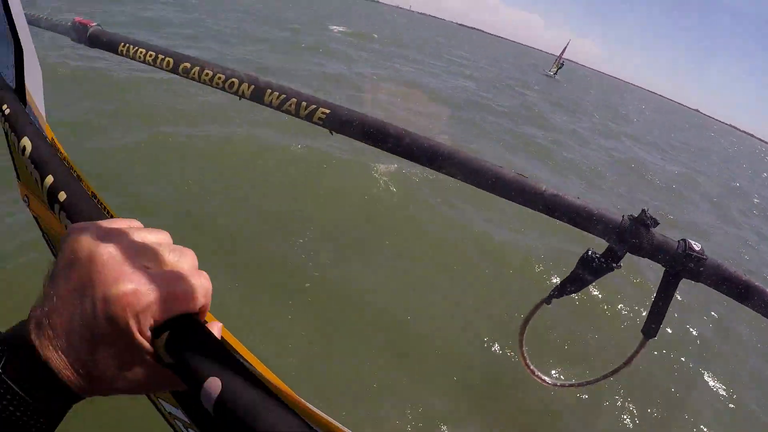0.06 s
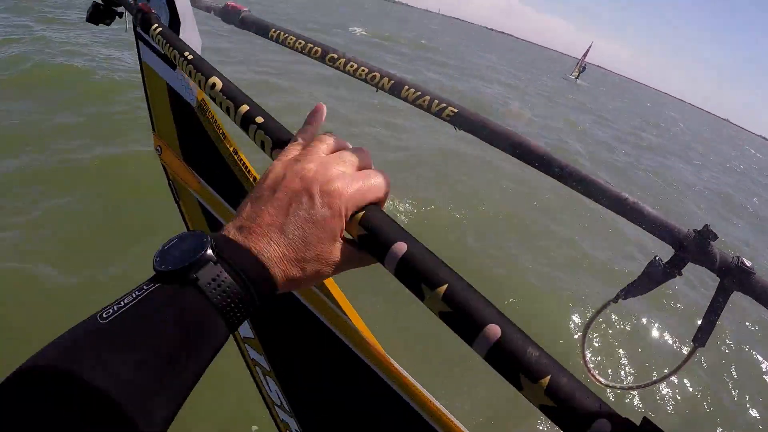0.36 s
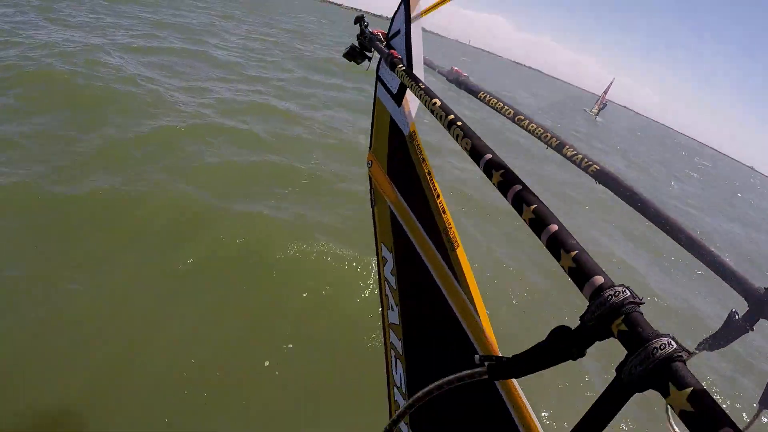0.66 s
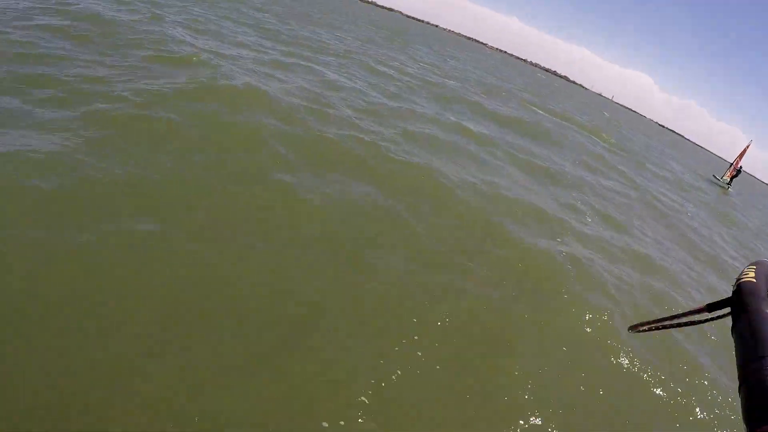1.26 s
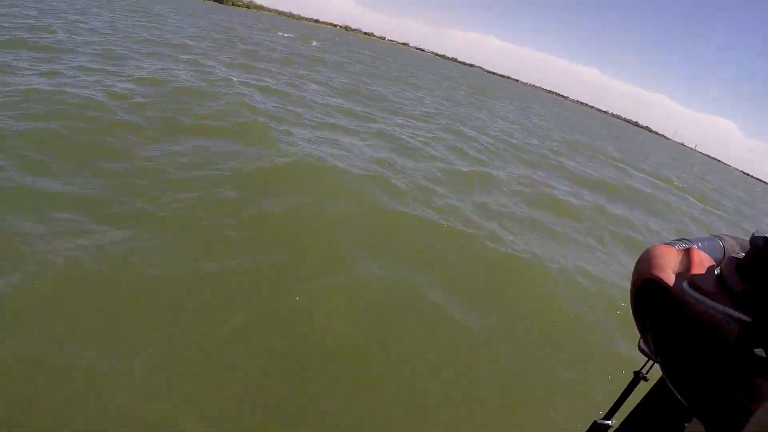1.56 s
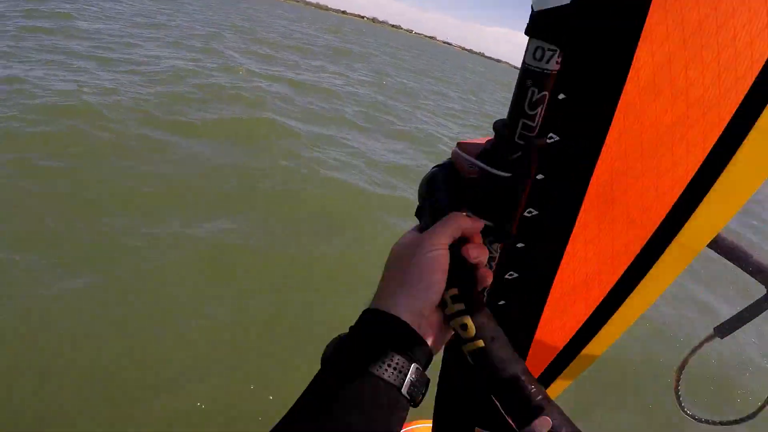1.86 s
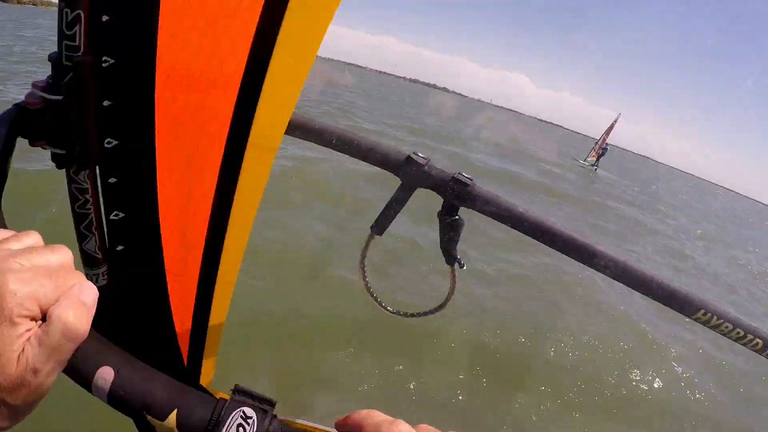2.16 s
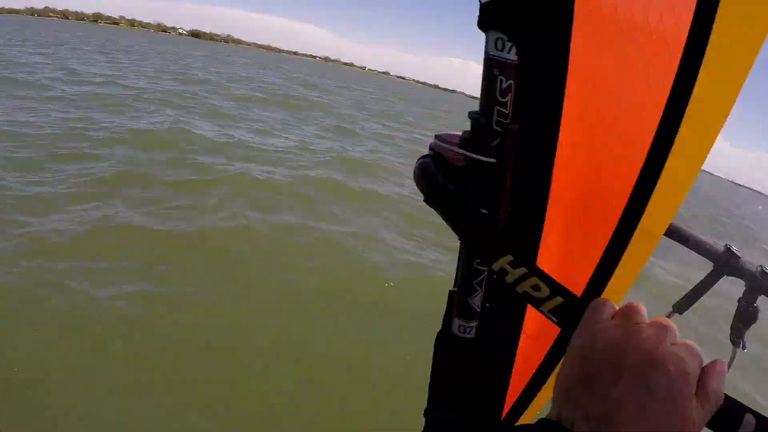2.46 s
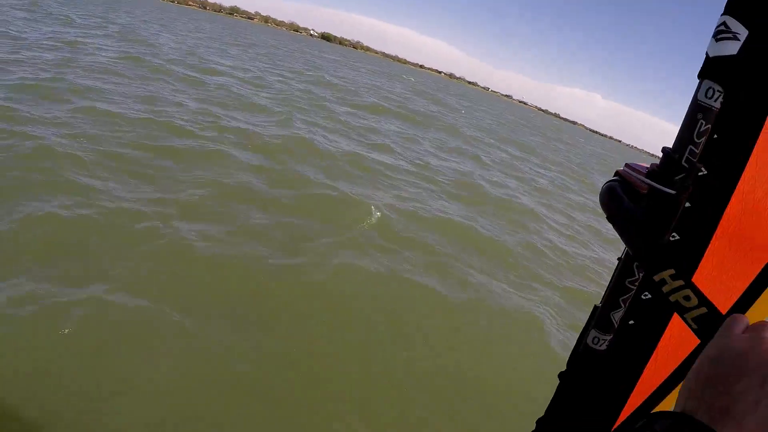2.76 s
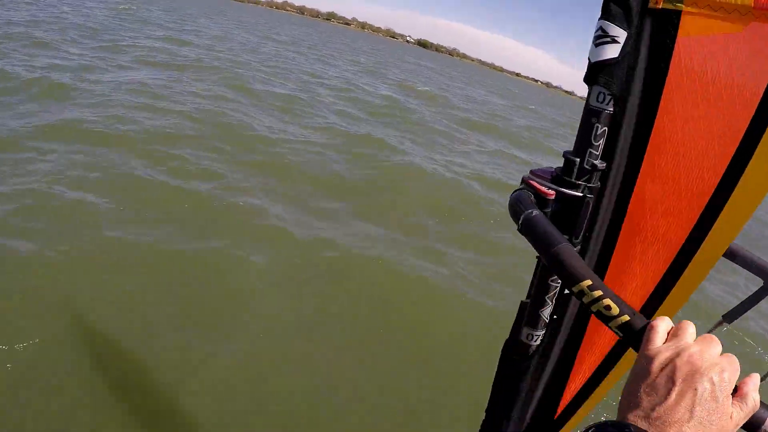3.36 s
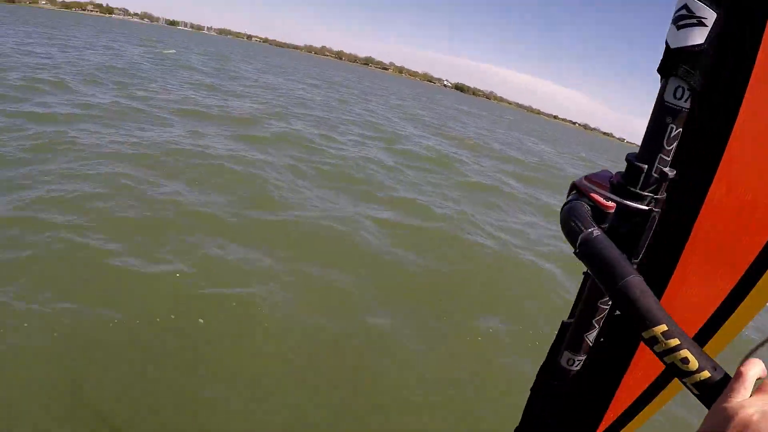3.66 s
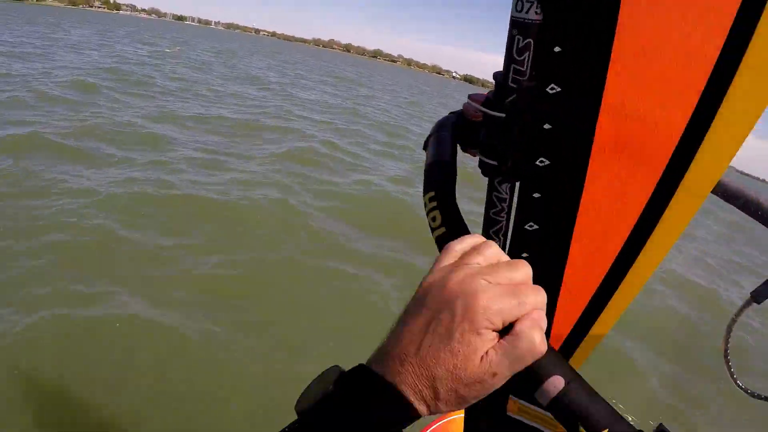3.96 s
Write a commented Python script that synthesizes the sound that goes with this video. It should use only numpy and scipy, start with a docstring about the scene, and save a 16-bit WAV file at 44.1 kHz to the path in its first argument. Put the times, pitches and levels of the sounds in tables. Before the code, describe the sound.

A windsurfing sail swings round with a faint swish, then snaps through with one loud thump. Sparse clacks and dull taps come before and after, over low wind rumble and soft water wash, close to a body-worn microphone.

```python
"""A windsurfing sail flips in a turn: it swishes round, its film shudders and its battens snap through.
The blows excite the damped modes of mast and boom; fittings clack, a hand scrapes and wet gear squeaks.
Dull taps ring the case of the body-worn waterproof camera that hears it all. Beneath lie the rumble
of turbulent wind and the wash of the board, with spitting spray, resonating bubbles and fizzing foam."""
import sys
import numpy as np
from scipy import signal
from scipy.fft import rfft, irfft, next_fast_len
from scipy.io import wavfile
from scipy.ndimage import uniform_filter1d

SR = 44100
rng = np.random.default_rng(int(sys.argv[2]) if len(sys.argv) > 2 else 0)


def generate_wav(signal):
    """Clip the signal to [-1, 1] and save it as 16-bit WAV at the path in sys.argv[1]."""
    frames = np.transpose(np.atleast_2d(signal))
    scaled = np.clip(frames, -1, 1) * 32767
    pcm = np.round(scaled).astype(np.int16)
    wavfile.write(sys.argv[1], SR, pcm)


N = 176400
T = np.arange(N) / SR


def undb(db):
    """Decibels to amplitude ratio."""
    return 10 ** (np.asarray(db) / 20)


def unit(x):
    """Normalisation to rms 1."""
    return x / np.sqrt(np.mean(x ** 2))


def curve(rows):
    """Gain envelope, linear in decibels between (time, level) points."""
    return undb(np.interp(T, *np.array(rows).T))


def colour(x, points):
    """Minimum-phase filter through (frequency, gain) points; it keeps the power of white noise."""
    size = next_fast_len(N + SR // 4, real=True) // 2 * 2
    hz, db = np.array(points, float).T
    log_hz = np.log(np.maximum(np.fft.rfftfreq(size, 1 / SR), 1))
    bass_cut_db = 20 * np.maximum(np.log(hz[0]) - log_hz, 0)
    gain = undb(np.interp(log_hz, np.log(hz), db) - bass_cut_db)
    cepstrum = irfft(np.log(unit(gain)))
    cepstrum[1:size // 2] *= 2  # folding makes the filter causal
    cepstrum[size // 2 + 1:] = 0
    return irfft(rfft(x, size) * np.exp(rfft(cepstrum)))[:N]


def band(x, hz, width):
    """Two equal resonators in cascade, output rms 1."""
    b, a = signal.iirpeak(min(hz, SR * .45), hz / width, fs=SR)
    return unit(signal.lfilter(b, a, signal.lfilter(b, a, x)))


def ring(start, hz, t60):
    """Free vibration of one mode: a damped sine."""
    out, live = np.zeros(N), slice(int(start * SR) + 1, int((start + 2 * t60) * SR))
    age = T[live] - start
    out[live] = np.sin(2 * np.pi * hz * age) * np.exp(-np.log(1000) * age / t60)
    return out


def fade(start, tau):
    """Sudden onset, then exponential decay with time constant tau."""
    return (T >= start) * np.exp(-np.minimum(abs(T - start) / tau, 50))


def bell(centre, sigma):
    """Gaussian envelope of standard deviation sigma."""
    out = np.zeros(N)
    live = slice(max(int((centre - 6 * sigma) * SR), 0), int((centre + 6 * sigma) * SR))
    out[live] = np.exp(-((T[live] - centre) / sigma) ** 2 / 2)
    return out


def wander(per_s):
    """Slow fluctuation: smoothed random steps, rms 1."""
    hold = max(int(SR / per_s), 2)
    steps = np.repeat(rng.standard_normal(N // hold + 1), hold)
    return unit(uniform_filter1d(uniform_filter1d(steps, hold), hold)[:N])


def grains(per_s, spread_db):
    """Shot noise: random impulses of uneven size, rms 1."""
    hits = (rng.random(N) < per_s / SR) * rng.choice([-1, 1], N)
    return unit(hits * undb(spread_db * np.minimum(rng.exponential(size=N), 5)))


def flicker(x, depth_db):
    """Independent amplitude modulation of seven octave bands."""
    octave = np.log2(np.maximum(np.fft.rfftfreq(N, 1 / SR), 1) / 250).clip(0, 6)
    spectrum = rfft(x)
    bands = (irfft(spectrum * np.maximum(1 - abs(octave - k), 0), N) for k in range(7))
    return sum(part * undb(depth_db * wander(29.96)) for part in bands)


# Gust envelope (time [s], relative level [dB])
GUSTS = [(0.0, -50), (0.15, -37), (0.19, -44.5), (0.31, -46.5), (0.52, -56), (0.63, -46), (0.76, -53),
         (0.78, -43), (0.93, -55), (1.43, -41), (1.54, -31.5), (1.66, -37), (1.8, -34), (1.86, -46),
         (2.35, -52), (2.38, -36.5), (2.47, -51.5), (2.6, -42), (2.7, -60.5), (2.81, -48), (2.87, -68),
         (2.97, -41), (3.0, -49), (3.2, -40.5), (3.24, -30.5), (3.45, -55.5), (3.51, -43.5), (4.0, -45.5)]
# Buffeting spectrum (frequency [Hz], gain [dB])
WIND_SPECTRUM = [(12, -15), (22, 0), (30, 4.5), (42, -2), (54, 0), (66, -15), (80, -24.5), (120, -32.5),
                 (200, -39), (500, -57.5), (3000, -100)]
def wind():
    """Turbulent pressure fluctuations buffet the case with a low rumble."""
    rumble = unit(colour(rng.standard_normal(N), WIND_SPECTRUM))
    running_rms = np.sqrt(uniform_filter1d(rumble ** 2, size=4000))
    return rumble / running_rms * curve(GUSTS) * undb(1)


# Slosh and wash envelopes (time [s], relative level [dB])
SLOSH_LEVEL = [(0, -62.5), (.14, -73.5), (.3, -72), (.52, -63), (.85, -75.5), (1.1, -85), (1.35, -81.5),
               (1.6, -63.5), (1.92, -57.5), (2.15, -63), (2.55, -66.5), (2.85, -73.5), (3.1, -72),
               (3.25, -65), (3.45, -67), (3.8, -70), (4, -70)]
WASH_LEVEL = [(0, -64.5), (.1, -73), (.6, -71), (.85, -73.5), (1.0, -75), (1.2, -75.5), (1.35, -72.5),
              (1.6, -69.5), (2.05, -74), (2.35, -66.5), (2.55, -68), (2.85, -73), (3.05, -70.5),
              (3.25, -67.5), (3.4, -69), (3.6, -70.5), (3.8, -66), (4, -72.5)]
# Their spectra (frequency [Hz], gain [dB])
SLOSH_SPECTRUM = [(60, -13), (110, 4.5), (180, -0.5), (300, -9), (600, -17.5), (1200, -34), (6000, -71)]
WASH_SPECTRUM = [(150, -19.5), (250, -3), (465, -3), (600, -5.5), (900, -5.5), (1650, -6), (1950, -3.5),
                 (2250, -7), (2800, -12.5), (3500, -11), (5100, -24), (5800, -18.5), (6300, -26.5),
                 (7000, -22.5), (8200, -32), (9700, -28), (11500, -31), (13200, -35.5), (15500, -48.5)]
def water():
    """Flow noise along the board: a low slosh and a grainy wash, each swelling at random."""
    slosh = colour(rng.standard_normal(N), SLOSH_SPECTRUM) * curve(SLOSH_LEVEL) * undb(wander(20) - 1)
    wash = colour(grains(per_s=6000, spread_db=2.5), WASH_SPECTRUM) * curve(WASH_LEVEL)
    wash *= undb(wander(25.12))
    return slosh + flicker(wash, depth_db=1.5)


def hiss():
    """Stationary broadband noise forms a faint floor."""
    spectrum = [(500, -16.5), (3000, 4), (9000, -4), (15000, -23)]  # (frequency [Hz], gain [dB])
    return undb(-84.5) * colour(rng.standard_normal(N), spectrum)


# Contacts on the boom (time [s], relative level [dB], time constant [s], ring gain [dB])
CONTACTS = [(.0425, -29.5, 0.00093, -3.5), (.0440, -25.5, .0012, -2), (0.273, -38.5, .002, -5),
            (2.2173, -38.5, 0.0019, -9), (2.244, -39, 0.00207, -8), (2.3657, -41, 0.0019, -9)]
# Contact spectrum (frequency [Hz], gain [dB])
CLACK_SPECTRUM = [(150, -19), (580, 0.5), (900, -0.5), (1700, -14), (2350, 7), (2800, -8), (3400, -7),
                  (4200, -11), (5000, -19.5), (7000, -28), (14000, -48.5)]
# Modes rung by the fittings (frequency [Hz], gain [dB], T60 [s])
CLACK_MODES = [(570, -21.5, 0.082), (2470, -5.5, .016), (2980, -36, 0.28)]
def fittings(click_share=0.4):
    """Hard impacts split their energy between a click and a chatter, and ring the boom tube."""
    force, rings, noise = np.zeros(N), np.zeros(N), rng.standard_normal(N)
    for start, db, tau, ring_db in CONTACTS:
        force += undb(db) * np.sqrt(1 - click_share) * fade(start, tau) * noise
        force[int((start + tau / 2) * SR)] += undb(db) * np.sqrt(click_share * tau * SR / 2)
        rings += sum(undb(db + ring_db + gain) * ring(start, hz, t60) for hz, gain, t60 in CLACK_MODES)
    return undb(-6.5) * colour(force, CLACK_SPECTRUM) + undb(-6) * rings


# Slips of wet gear (time [s], level [dB], sigma [s], centre frequency [Hz])
SLIPS = [(.055, -56, 0.0048, 6780), (1.452, -73.5, 0.0086, 9100), (3.158, -66, 0.0046, 9460),
         (3.647, -73, .003, 7000), (3.667, -71.5, 0.0043, 8800), (3.745, -57, 0.0055, 6700),
         (3.86, -60.5, .004, 6900)]
def squeaks():
    """Friction between wet surfaces gives brief, high bursts of narrow-band noise."""
    noise = rng.standard_normal(N)
    return sum(undb(db) * bell(time, sigma) * band(noise, hz, width=800) for time, db, sigma, hz in SLIPS)


# Showers of spray (time [s], level [dB], sigma [s])
SHOWERS = [(0.056, -64, 0.0026), (.445, -72.5, 0.0076), (1.07, -78, 0.023), (1.098, -67.5, .001),
           (1.417, -74.5, 0.025), (1.646, -72, 0.0082), (1.915, -72.5, 0.061), (2.051, -69.5, 0.026),
           (2.099, -73, 0.0011), (2.243, -75, 0.0064), (2.713, -72, 0.012), (3.095, -71, 0.0074),
           (3.152, -69.5, 0.017), (3.355, -64.5, 0.0011), (3.764, -63.5, 0.02), (3.865, -68, 0.0067)]
# Droplet spectrum (frequency [Hz], gain [dB])
SPRAY_SPECTRUM = [(1500, -9.5), (3500, 7), (5000, 0.5), (7000, 2), (8200, -6.5), (9800, -4), (11000, -11.5),
                  (13500, -11.5), (16000, -25)]
def spray():
    """Random droplet impacts add up to short showers of shot noise."""
    envelope = sum(undb(db) * bell(time, sigma) for time, db, sigma in SHOWERS)
    drops = grains(per_s=900, spread_db=3) + rng.standard_normal(N) / 2
    return colour(drops * envelope, SPRAY_SPECTRUM)


# Envelope of the swinging sail (time [s], level [dB])
SWISH_LEVEL = [(.08, -81), (.2, -68), (.35, -61.5), (.42, -66), (.49, -61.5), (.58, -72), (.85, -77.5)]
# Swish spectrum (frequency [Hz], gain [dB])
SWISH_SPECTRUM = [(180, -26), (300, 4.5), (382, -4), (471, -14), (518, -9), (853, 2.5), (970, -7),
                  (1050, -0.5), (2030, -1.5), (2390, -2), (3510, -9.5), (4330, -26), (14000, -39)]
def sail_swish():
    """The swinging film radiates clicks so dense that they merge into noise."""
    rustle = colour(grains(per_s=6300, spread_db=3), SWISH_SPECTRUM)
    return rustle * curve(SWISH_LEVEL) * undb(1.7 * wander(35)) * (T < SWISH_LEVEL[-1][0])


# Bubble clusters beside the board (time [s], level [dB], sigma [s], centre frequency [Hz])
CLUSTERS = [(.14, -69, 0.024, 553), (1.305, -69, .015, 826), (1.548, -67, 0.019, 910),
            (2.641, -79.5, .06, 5720), (3.218, -72.5, 0.022, 1090), (3.599, -67, 0.053, 1003)]
def gurgles(bubbles_per_s=160, life_cycles=16):
    """Each bubble is a damped oscillator whose pitch rises as it dies away."""
    out, age = np.zeros(N), T[:2000]
    for time, db, sigma, centre_hz in CLUSTERS:
        cluster = np.zeros(N)
        count = max(int(3 * sigma * bubbles_per_s), 2)
        for offset, pitch, size in rng.standard_normal((40, 3))[:count]:
            cycles = centre_hz * np.exp(.35 * pitch) * age
            chirp = np.sin(2 * np.pi * cycles * (1 + .008 * cycles))
            decay = np.exp(-3 * cycles / life_cycles)
            start = int(np.clip((time + sigma * offset) * SR, 0, N - len(age)))
            cluster[start:start + len(age)] += undb(3 * size) * chirp * decay
        out += undb(db) * unit(cluster) * np.sqrt(2 * sigma * SR / N)
    return out


# Taps on the case (time [s], level [dB], pop frequency [Hz], tick gain [dB])
CASE_TAPS = [(.2510, -47, 1350, -30), (1.3284, -43, 1110, -35), (1.4902, -43.5, 940, -39),
             (1.9240, -36.5, 1040, -36), (2.0730, -29.5, 1110, -24.5), (2.5262, -33, 1120, -44),
             (2.9570, -32.5, 1080, -21), (3.496, -45, 1030, -44), (3.7815, -29.5, 1085, -33)]
# Modes of the case (frequency [Hz], gain [dB], T60 [s])
SHELL_MODES = [(464, -27, 0.027), (550, -16.5, 0.046), (800, -28, 0.014), (1500, -24, 0.02),
               (2010, -16, 0.014)]
# Tick spectrum (frequency [Hz], gain [dB])
TICK_SPECTRUM = [(2000, 16), (4000, 8.5), (7000, 17.5), (10000, -13.5), (14000, -32.5)]
def case_taps():
    """Impulse response of the camera case: a brief pop, a faint tick and a short ring."""
    out, fizz = np.zeros(N), colour(rng.standard_normal(N), TICK_SPECTRUM)
    for time, db, pop_hz, tick_db in CASE_TAPS:
        pop = np.cos(2 * np.pi * pop_hz * (T - time)) * bell(time, sigma=0.00051)
        tick = undb(tick_db) * fizz * bell(time, sigma=0.00034)
        rings = sum(undb(gain) * ring(time, hz, t60) for hz, gain, t60 in SHELL_MODES)
        out += undb(db) * (pop + tick + rings)
    return out


# Resonances of the boom tube (frequency [Hz], bandwidth [Hz], gain [dB])
TUBE_MODES = [(2830, 160, -5), (4730, 370, -17), (6550, 270, -24), (9470, 400, -23)]
def boom_slide():
    """Friction of a hand sliding off the boom scrapes and drives the tube's resonances."""
    friction = grains(per_s=2700, spread_db=5.5)
    scrape = band(friction, hz=3300, width=1200) * bell(0.345, sigma=0.032)
    tube = sum(undb(db) * band(friction, hz, width) for hz, width, db in TUBE_MODES)
    return undb(-66) * scrape + undb(-68.5) * tube * bell(0.51, sigma=0.14)


# Envelope of the filling sail (time [s], level [dB])
SHUDDER_LEVEL = [(1.61, -80), (1.631, -56), (1.655, -66.5), (1.68, -60), (1.697, -41.5), (1.703, -32),
                 (1.735, -41), (1.775, -42), (1.825, -46), (1.845, -58), (1.93, -68.5), (2.1, -71)]
# Crackle spectrum (frequency [Hz], gain [dB])
SHUDDER_SPECTRUM = [(60, 0.5), (110, -2.5), (170, -7), (300, -5), (520, -17), (650, -21), (800, -2),
                    (950, -9), (1350, -1), (1650, -3), (1950, 1.5), (2550, -8), (2850, -7.5), (3400, -1.5),
                    (4000, -13), (4300, -19), (4550, -14.5), (5000, -26.5), (6900, -26.5), (10000, -42),
                    (15000, -56)]
def sail_shudder():
    """The film crackles as it fills: a surge of filtered shot noise."""
    filling = (T > SHUDDER_LEVEL[0][0]) * (T < SHUDDER_LEVEL[-1][0])
    return colour(grains(per_s=4000, spread_db=1) * curve(SHUDDER_LEVEL) * filling, SHUDDER_SPECTRUM)


# Batten blows (time [s], relative level [dB], time constant [s], added treble [dB])
BLOWS = [(1.7000, -12, 0.0015, 1), (1.7035, -15.5, 0.0048, 3), (1.7092, -9.5, 0.0033, 4.5),
         (1.714, -35, 0.0041, -7), (1.7198, -15, 0.0072, -17), (1.7263, -14, 0.006, -26),
         (1.748, -23.5, 0.0056, -7), (1.822, -23, 0.01, -18)]
# Blow spectrum (frequency [Hz], gain [dB])
BLOW_SPECTRUM = [(60, -4), (140, 9), (220, -1), (280, 3.5), (400, 1.5), (540, -6), (800, 0.5), (1400, -0.5),
                 (2600, -7), (3400, -0.5), (4200, -12.5), (7000, -26), (11000, -35.5), (15000, -54)]
# Modes of mast and boom (frequency [Hz], relative level [dB], T60 [s])
SPAR_MODES = [(105.5, -30, .2), (186, -36, 0.21), (261, -33, 0.17), (335, -31, .14), (724, -34.5, 0.18),
              (807, -33.5, .15), (1285, -36.5, 0.12), (1325, -41, 0.13), (1873, -27, 0.12),
              (1960, -25.5, 0.082), (2212, -31, 0.088), (3410, -26, 0.056), (3530, -26, 0.051),
              (5830, -30.5, 0.031), (6870, -33, 0.025)]
def batten_snap():
    """Snap-through buckling: a run of blows shoves the air and rings the rig; a low thud follows."""
    noise = rng.standard_normal(N)
    treble = signal.sosfilt(signal.butter(2, 2800, "hp", fs=SR, output="sos"), rng.standard_normal(N))
    force = sum(undb(db) * fade(start, tau) * (noise + undb(treble_db) * treble)
                for start, db, tau, treble_db in BLOWS)
    onsets = BLOWS[1][0] + 0.00613 * rng.random(len(SPAR_MODES))  # just after the second blow
    rings = sum(undb(db) * ring(start, hz, t60) for start, (hz, db, t60) in zip(onsets, SPAR_MODES))
    thud = ring(1.9, hz=59, t60=0.13)
    return undb(-17) * colour(force, BLOW_SPECTRUM) + undb(-4.5) * rings + undb(-34) * thud


# Knocks of sail, hands and board (time [s], level [dB], frequency [Hz], T60 [s])
KNOCKS = [(1.7065, -21.5, 110.8, .04), (1.784, -27.5, 54, 0.099), (2.379, -31.5, 42, .09),
          (2.385, -43, 290, 0.047), (1.9, -45, 330, 0.019), (3.6, -33, 40, .09)]
def bumps():
    """Soft impacts start low, heavily damped vibrations with a rounded attack."""
    return sum(undb(db) * ring(start, hz, t60) * (1 - fade(start, tau=0.14 / hz))
               for start, db, hz, t60 in KNOCKS)


# Spectrum of the sail's belly (frequency [Hz], gain [dB])
BELLY_SPECTRUM = [(60, 7), (130, 2.5), (300, 1.5), (600, -1.5), (1200, -4), (2000, -9.5), (3500, -22.5),
                  (8000, -65), (14000, -59)]
def sail_belly(t60=1.0):
    """Free decay of a membrane: after the snap the cloth rings away as dull noise."""
    decay = fade(1.71, tau=t60 / np.log(1000))
    return undb(-40) * colour(rng.standard_normal(N) * decay, BELLY_SPECTRUM)


# Foam left by breaking wavelets (time [s], level [dB], sigma [s], centre frequency [Hz])
PATCHES = [(2.04, -65.5, 0.014, 3560), (2.13, -71.5, 0.035, 2780), (2.33, -73.5, 0.099, 3500),
           (2.61, -73.5, 0.14, 2120), (3.264, -76, 0.023, 2800), (3.94, -75.5, 0.078, 3370)]
def foam():
    """Many tiny bursting bubbles sum to patches of band-limited fizz."""
    fizz = grains(per_s=2500, spread_db=1)
    return sum(undb(db) * bell(time, sigma) * band(fizz, hz, width=980)
               for time, db, sigma, hz in PATCHES)


def scene():
    """Superposition in a free field: all sources reach one microphone with no echo."""
    sail = batten_snap() + sail_swish() + sail_shudder() + sail_belly()
    handling = boom_slide() + fittings() + squeaks() + bumps() + case_taps()
    surroundings = spray() + foam() + gurgles() + wind() + water() + hiss()
    return (sail + handling + surroundings)[None]


def record(dry):
    """Band limiting: the camera's steep low-pass filter cuts the top of the treble."""
    return signal.sosfilt(signal.ellip(8, .2, 70, 15200, fs=SR, output="sos"), dry)


dry = scene()
out = record(dry)
generate_wav(out)
```